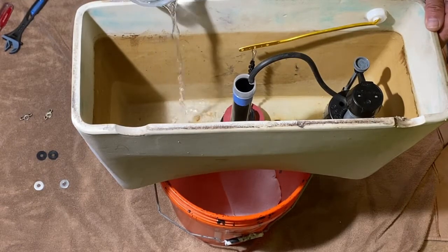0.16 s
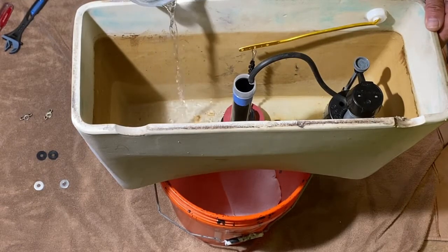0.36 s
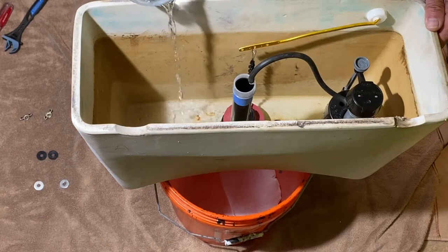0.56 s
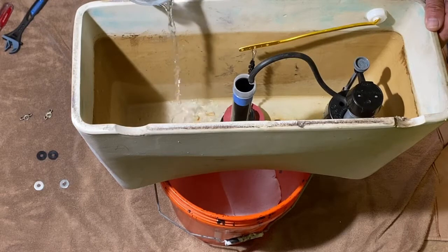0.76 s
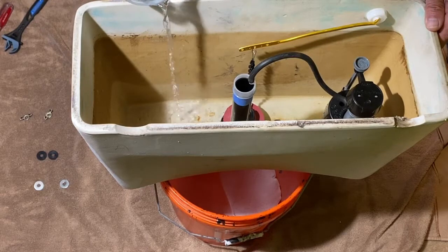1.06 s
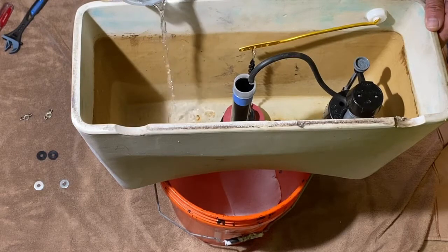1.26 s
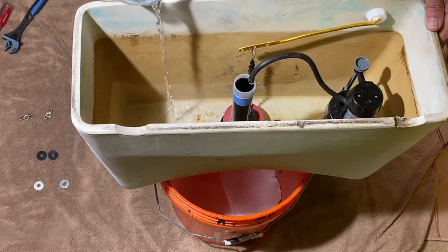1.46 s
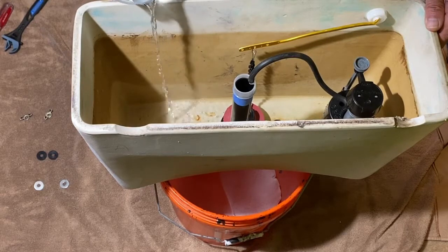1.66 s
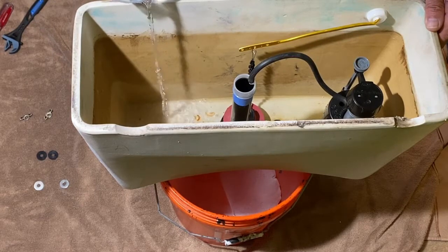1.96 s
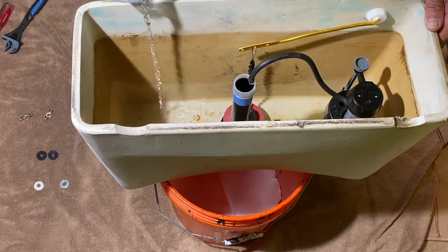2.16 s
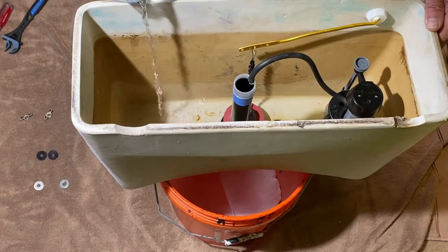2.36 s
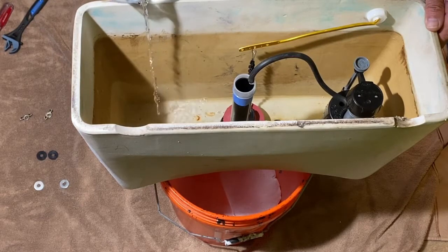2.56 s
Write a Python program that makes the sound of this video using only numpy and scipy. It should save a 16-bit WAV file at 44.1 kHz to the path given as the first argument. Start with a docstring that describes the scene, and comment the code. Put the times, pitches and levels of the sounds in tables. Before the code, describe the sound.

A thin stream of water splashes and patters into an empty ceramic toilet tank.

```python
"""A dense patter of drops comes first, with a hollow ring and a low room rumble beneath it.
A thin stream of water is falling from a jug onto the wet floor of an empty ceramic toilet tank.
It breaks into small and large drops; some trap an air bubble that rings, two with a loud plop.
The hard walls throw every splash back and ring along. It is all heard from close above."""
import sys
import numpy as np
from scipy import signal
from scipy.fft import rfft, irfft
from scipy.io import wavfile
from scipy.ndimage import uniform_filter1d

SR = 44100
rng = np.random.default_rng(int(sys.argv[2]) if len(sys.argv) > 2 else 0)


def dump(signal):
    """Clip the signal to [-1, 1] and save it as 16-bit WAV at the path in sys.argv[1]."""
    limited = np.clip(np.atleast_2d(signal).T, -1, 1)
    pcm = np.round(limited * 32767).astype(np.int16)
    wavfile.write(sys.argv[1], SR, pcm)


N = 119070


def amp(db):
    """Turns decibels into a number to multiply a sound by."""
    return 10 ** (np.asarray(db) / 20)


def unit(x):
    """Scales a sound so that its average strength (rms) is 1."""
    return x / np.sqrt(np.mean(x ** 2) + 1e-20)


def read(points, hz):
    """Looks up frequencies in a table, sliding between its rows on a musical (log) scale."""
    row_hz, value = np.transpose(points)
    return np.interp(np.log(hz + 1), np.log(row_hz), value)


def curve(points):
    """Turns a (time [s], level [dB]) table into a volume for every sample."""
    return amp(np.interp(np.arange(N) / SR, *np.transpose(points)))


def add(mix, start_s, sound):
    """Mixes a sound in at the given time."""
    part = mix[max(round(start_s * SR), 0):][:len(sound)]
    part += sound[:len(part)]


def colour(x, points, size=2048):
    """Shapes bass and treble by a table, without smearing any sound earlier in time."""
    log_gain = np.log(amp(read(points, abs(np.fft.fftfreq(size, 1 / SR)))))
    response = np.exp(np.conj(signal.hilbert(log_gain)))
    taps = np.fft.ifft(response).real
    return signal.oaconvolve(x, taps[:size // 2])[:N]


def drip(hz, db, width_hz=2380, decay_s=0.0012, size=512):
    """A small drop lands: a tiny burst of noise, strongest around a pitch of its own."""
    t = np.arange(size) / SR
    burst = rng.standard_normal(size) * np.exp(-t / decay_s)
    pole = np.exp((2j * np.pi * hz - np.pi * width_hz) / SR)
    pitched = signal.lfilter([1], [1, -pole], burst).real
    return walls(amp(db) * unit(pitched))


# how strong the stream is: (time [s], level [dB])
STREAM_STRENGTH = [(0, 2.5), (.2, 0.5), (.45, 0), (.75, 2), (1.0, 2), (1.4, -1), (1.7, 0), (2.1, -1),
                   (2.5, -1), (2.6, -10.5), (2.7, -0.5)]


def patter(drips_per_s=150, spray_per_s=5300):
    """The stream breaks up into fine spray and small drops that land at uneven times."""
    clicks = rng.standard_normal(N) * amp(1.5 * np.minimum(rng.exponential(1, N), 4))
    lands = rng.random(N) < spray_per_s / SR
    mix = amp(-52) * unit(clicks * lands)
    for k, (nudge, strength) in enumerate(rng.standard_normal((int(drips_per_s * N / SR), 2))):
        add(mix, (k + nudge) / drips_per_s, drip(hz=rng.uniform(4630, 16100), db=-47.5 + 2 * strength))
    return mix * curve(STREAM_STRENGTH)


def walls(sound, delay_s=0.002, decay_s=0.0018, echo_db=-4, size=1024):
    """Adds quick bounces off the near walls, different for each spot where a drop lands."""
    t = np.arange(size) / SR
    bounces = rng.standard_normal(size) * (rng.random(size) < 0.2)
    bounces *= (t > delay_s) * np.exp(-t / decay_s)
    direct = t == 0
    return signal.fftconvolve(sound, direct + amp(echo_db) * bounces / np.linalg.norm(bounces))


# the tank's own notes: (pitch [Hz], level [dB], time to fade by 60 dB [s])
TANK_NOTES = [(239.5, -11, 0.29), (276.4, -9.5, 0.57), (659, -25, 0.17), (733, -16.5, 0.26),
              (881, -22, 0.32), (1141.5, -19, 0.23), (1200, -21, 0.34), (1343, -8, 0.055),
              (1766, -10, 0.077), (1868, -21.5, 0.092), (2061, -16.5, 0.13), (2437, -28, 0.16),
              (2746, -28, 0.24), (3215, -17, 0.095), (3480, -31, 0.18)]


def ring(sound, size=32768):
    """The tank answers a sound with its own fading notes."""
    t = np.arange(size) / SR
    notes = sum(amp(db - 60 * t / fade_s) * np.sin(2 * np.pi * hz * t) for hz, db, fade_s in TANK_NOTES)
    return signal.fftconvolve(sound, notes)[:len(sound)]


# how strongly the tank knocks and rings, less as water covers its floor: (time [s], level [dB])
RING_STRENGTH = [(0, -2), (.2, 1), (.33, -2), (.65, 1), (.82, 2), (1.05, -7), (1.5, -9.5), (2.2, -6.5),
                 (2.7, -18)]


def drumming(db=-57, width=0.19):
    """The steady push of the stream keeps the hollow tank ringing."""
    pushes = rng.standard_normal((2, N + SR))  # a spare second lets the ring build up
    mid, side = (unit(ring(push)[SR:]) for push in pushes)
    return amp(db) * curve(RING_STRENGTH) * np.array([mid + width * side, mid - width * side])


# how long the echoes last: (frequency [Hz], time to fade by 60 dB [s])
ECHO_FADE = [(250, 0.1), (1300, 0.42), (3000, 0.23), (7000, 0.39), (15000, 1.1)]
# how loud the echoes are: (frequency [Hz], level [dB])
ECHO_COLOUR = [(400, -5.5), (1600, -0.5), (3000, -11), (7000, -9), (15000, -26)]


def echoes(rise_s=0.0018, size=32768):
    """Sound bouncing between the walls blurs into a tail; its highest part is faint but lasts longest."""
    t = np.arange(size) / SR
    hz, when, bands = signal.stft(rng.standard_normal(size), SR, nperseg=256)
    fade_s = read(ECHO_FADE, hz)[:, None]
    bands = bands * amp(read(ECHO_COLOUR, hz)[:, None] - 60 * when / fade_s)
    bands *= np.sqrt(2 * np.log(1000) / (fade_s * SR))  # a longer fade adds no extra energy
    tail = signal.istft(bands, SR, nperseg=256)[1][:size]
    return tail * (1 - np.exp(-t / rise_s))


def tank(water, spots=4, ring_db=-32, width=0.19):
    """The water with the tank's ring and echoes; the echoes change as the stream wanders about."""
    spot = np.repeat(rng.integers(0, spots, N // 512 + 1), 512)[:N]  # where the stream is landing
    mid, side = (sum(signal.fftconvolve(water * (spot == k), echoes())[:N] for k in range(spots))
                 for _ in range(2))
    mid = water + mid + amp(ring_db) * ring(water * curve(RING_STRENGTH))
    return np.array([mid + width * side, mid - width * side])


# the rumble's balance of bass and treble: (frequency [Hz], level [dB])
RUMBLE_COLOUR = [(20, -15.5), (45, -4), (58, 3), (75, -1), (100, -9.5), (130, -13.5), (180, -23),
                 (260, -16), (310, -30.5), (450, -32.5), (1000, -44), (16000, -60)]
# how alike it is in both ears: (frequency [Hz], likeness [0-1])
RUMBLE_LIKENESS = [(50, 1), (150, 0.91), (280, 0.91), (1000, 0.17), (8000, 1)]
# how its bass rises and falls: (time [s], level [dB])
BASS_SWELL = [(0, 1), (.1, -3), (.55, -3), (.93, -2), (1.25, -2.5), (1.48, -11), (1.57, 1), (1.65, -7.5),
              (1.75, -0.5), (1.85, -3.5), (1.95, -17), (2.06, 5.5), (2.15, -8), (2.4, -5), (2.7, -6)]


def rumble(db=-49.5, bass_below_hz=140):
    """Low room noise, nearly the same in both ears, whose bass swells and sinks."""
    hz = np.fft.rfftfreq(N, 1 / SR)
    alike = np.clip(read(RUMBLE_LIKENESS, hz), 0, 1)
    spectra = rfft(rng.standard_normal((2, N))) * amp(read(RUMBLE_COLOUR, hz))
    mid, side = spectra * np.sqrt([1 + alike, 1 - alike])
    noise = unit(irfft(np.array([mid + side, mid - side]), N))
    bass = signal.sosfiltfilt(signal.butter(2, bass_below_hz, fs=SR, output="sos"), noise)
    return amp(db) * (noise + bass * (unit(curve(BASS_SWELL)) - 1))


def bubble(hz, db, decay_s, rise_cycles=1.66, glide_per_s=5.5, wobble_depth=0.098, size=1500):
    """Air trapped in churning water pushes the floor and rings: a wobbly tone that rises a little."""
    t = np.arange(size) / SR
    wobble = unit(uniform_filter1d(rng.standard_normal(size), size=20))
    wobble -= uniform_filter1d(wobble, size=100)  # keep only the quick wobbles
    cycles = np.cumsum(hz * (1 + glide_per_s * t + wobble_depth * wobble)) / SR
    swell = 1 - np.exp(-hz * t / rise_cycles)
    tone = swell * np.exp(-t / decay_s) * np.sin(2 * np.pi * cycles)
    push_age = hz * t / 0.54  # the soft push peaks after about half a cycle
    push = amp(-28) * push_age * np.exp(-push_age)
    return walls(amp(db) * (tone + push))


# two sizes of faint bubble: (rate [per s], typical pitch [Hz], typical level [dB], decay time [s])
FAINT_BUBBLES = [(170.3, 2963, -52, 0.0023), (169.4, 6000, -51, 0.0016)]


def fizz(spread_octaves=0.279, spread_db=2.5):
    """Many faint bubbles ring at scattered pitches, louder when the stream is stronger."""
    mix = np.zeros(N)
    for per_s, hz, db, decay_s in FAINT_BUBBLES:
        for k, (nudge, pitch, strength) in enumerate(rng.standard_normal((int(per_s * N / SR), 3))):
            sound = bubble(hz * 2 ** (spread_octaves * pitch), db + spread_db * strength, decay_s)
            add(mix, (k + nudge) / per_s, sound)
    return curve(STREAM_STRENGTH) * mix


def splat(db, rise_s=0.00021, decay_s=0.0012, roughness=0.22, size=512):
    """A large drop flattens: a grainy burst about a thousandth of a second long."""
    t = np.arange(size) / SR
    noise, grain = rng.standard_normal((2, size))
    shape = (1 - np.exp(-t / rise_s)) * np.exp(-t / decay_s)
    return walls(amp(db) * unit(noise * np.exp(roughness * grain) * shape))


# large drops landing, before their tone is shaped: (time [s], tick level [dB], slap level [dB])
LARGE_DROPS = [(0.1444, -36.5, -45), (0.159, -31.5, -53), (0.1782, -38, -54), (0.2165, -32.5, -52),
               (0.2513, -35.5, -75), (0.4679, -31.5, -64), (0.5086, -32.5, -67), (0.5550, -26.5, -36.5),
               (0.6232, -41, -42), (0.6456, -18.5, -28.5), (.654, -45, -37), (0.6775, -26, -42),
               (0.7281, -30.5, -51), (.772, -50, -43), (0.787, -39, -36), (.813, -45, -48.5),
               (0.8877, -26.5, -27.5), (0.8937, -42, -41), (0.9095, -37, -50), (0.978, -33, -43.5),
               (1.1091, -26.5, -71), (1.2557, -36.5, -61), (1.2744, -35.5, -51), (1.3345, -29.5, -45),
               (1.4085, -29, -60), (1.4397, -45, -59), (1.4565, -37, -43), (1.5348, -32.5, -49),
               (1.5812, -31.5, -40), (1.7182, -23, -58), (1.7902, -30, -44), (1.8706, -33, -49),
               (1.932, -30, -39), (1.9899, -37.5, -45), (2.0492, -34.5, -50), (2.0689, -34, -42.5),
               (2.1207, -40, -37), (2.1814, -29.5, -49), (2.2297, -41, -46.5), (2.259, -30.5, -55),
               (2.3037, -41, -70), (2.333, -36, -53.5), (2.356, -46, -44), (2.4086, -31, -68),
               (2.4316, -37, -46.5), (2.4537, -33.5, -49), (2.4751, -34, -39.5), (2.5392, -35.5, -54),
               (2.664, -67, -51), (2.6808, -36, -65)]
# the tone of a drop's bright tick: (frequency [Hz], level [dB])
TICK_TONE = [(500, -30), (2500, -22), (4500, -28), (6500, -9.5), (9000, -3), (12500, -7), (15300, -3),
             (17000, -22)]
# the tone of its wet slap: (frequency [Hz], level [dB])
SLAP_TONE = [(150, -28), (900, -21), (1600, -10.5), (3000, 2), (4200, -3), (6500, -1), (10000, -14.5)]
# the tone of its knock on the nearly bare floor: (frequency [Hz], level [dB])
KNOCK_TONE = [(270, -16.5), (1000, -23.5), (1600, -9.5), (4000, -26.5)]


def spatter(small_drops):
    """Large drops join the small ones; each hits the floor with a tick, a wet slap and a knock."""
    ticks, slaps = small_drops.copy(), amp(-5.5) * small_drops
    for start_s, tick_db, slap_db in LARGE_DROPS:
        add(ticks, start_s, splat(tick_db))
        add(slaps, start_s, splat(slap_db))
    knocks = slaps * curve(RING_STRENGTH)
    return colour(ticks, TICK_TONE) + colour(slaps, SLAP_TONE) + colour(knocks, KNOCK_TONE)


# bubbles that stand out: (time [s], pitch [Hz], level [dB], decay time [s])
CLEAR_BUBBLES = [(0.219, 7170, -28.5, 0.0017), (.292, 7170, -29.5, 0.0015), (.379, 3044, -26, 0.0018),
                 (0.5553, 7460, -13, 0.0009), (0.6463, 2856, -2.5, 0.00087), (.679, 7400, -16, 0.00075),
                 (0.7279, 6780, -23, 0.0014), (0.7851, 8030, -26.5, 0.0014), (.787, 2900, -40, 0.001),
                 (0.814, 1842, -32.5, 0.0017), (0.8881, 3350, -3.5, 0.00069), (0.91, 7650, -18, 0.0017),
                 (.958, 1810, -38.5, 0.0025), (1.156, 3490, -35.5, 0.0038), (1.196, 8770, -26.5, 0.0018),
                 (1.256, 2935, -36.5, 0.0059), (1.366, 2710, -39.5, 0.0033), (1.466, 8160, -28, 0.0017),
                 (1.561, 2760, -39, 0.0048), (1.582, 7980, -22.5, 0.0015), (1.661, 2840, -39.5, 0.0034),
                 (1.693, 2750, -35, 0.0032), (1.855, 5920, -32, 0.0018), (1.859, 3190, -30.5, 0.0028),
                 (1.9327, 5950, -12.5, 0.00068), (1.950, 6800, -27, 0.0012), (1.992, 2660, -36, 0.0027),
                 (2.234, 6730, -27, 0.0016), (2.2615, 6500, -25, 0.001), (2.36, 5470, -22, 0.00098),
                 (2.482, 3040, -35.5, 0.0023), (2.664, 3250, -31, 0.0019)]


def plops():
    """Some drops trap a bubble that rings out as a clear plink or plop."""
    mix = np.zeros(N)
    for start_s, hz, db, decay_s in CLEAR_BUBBLES:
        add(mix, start_s, bubble(hz, db, decay_s))
    return mix


def scene():
    """Drops and bubbles in the ringing tank, over the rumble of the room."""
    return rumble() + drumming() + tank(spatter(patter()) + plops() + fizz())


# how far the left side's wave runs ahead of the right: (frequency [Hz], lead [radians])
LEFT_LEAD = [(800, 0.18), (1200, 1), (2200, 0.1), (3000, 0.23), (4200, 0)]


def record(dry, lag_s=0.000233, lag_above_hz=6950, top_hz=16000):
    """The left side is a little early in the middle pitches, late in the treble; the very top is cut."""
    hz = np.fft.rfftfreq(N, 1 / SR)
    phase = read(LEFT_LEAD, hz) - 2 * np.pi * lag_s * np.maximum(hz - lag_above_hz, 0)
    left = irfft(rfft(dry[0]) * np.exp(1j * phase), N)
    top_cut = signal.firwin(121, top_hz, window=("kaiser", 8), fs=SR)
    return signal.oaconvolve(np.array([left, dry[1]]), top_cut[None], "same")


dry = scene()
out = record(dry)
dump(out)
```